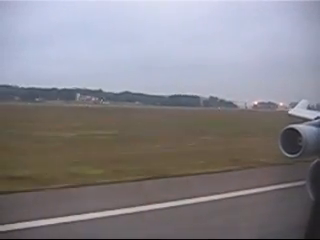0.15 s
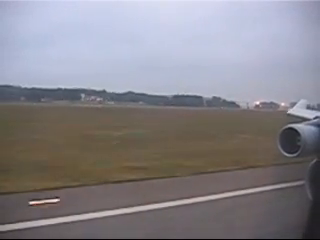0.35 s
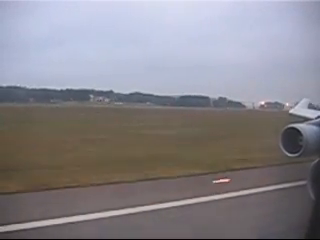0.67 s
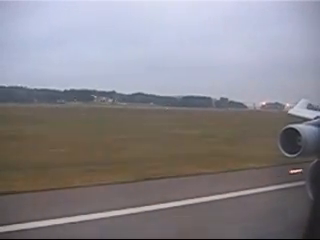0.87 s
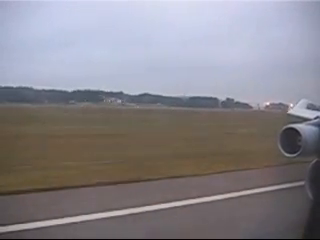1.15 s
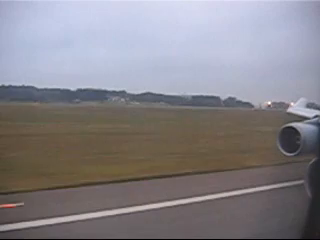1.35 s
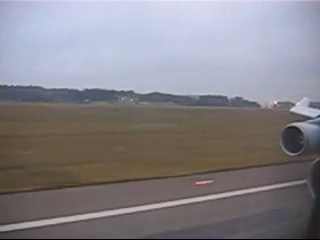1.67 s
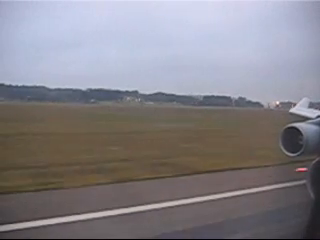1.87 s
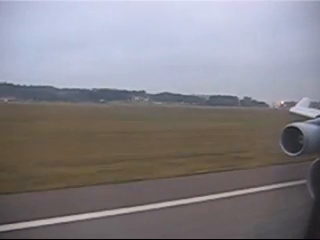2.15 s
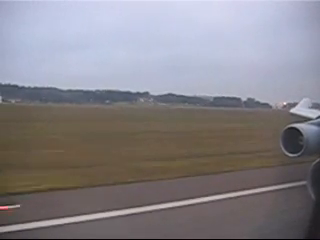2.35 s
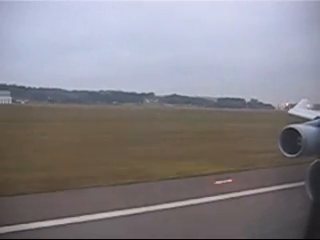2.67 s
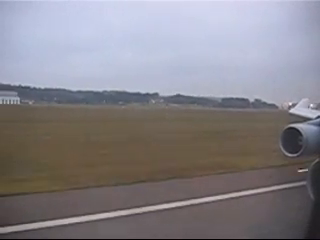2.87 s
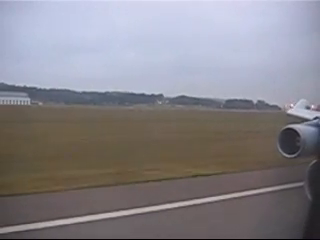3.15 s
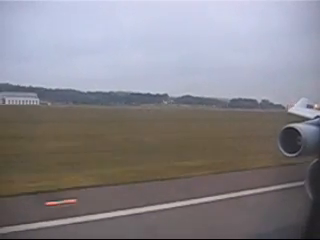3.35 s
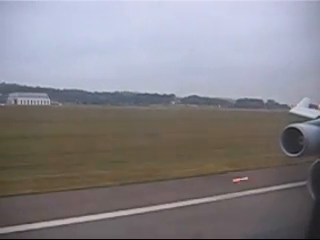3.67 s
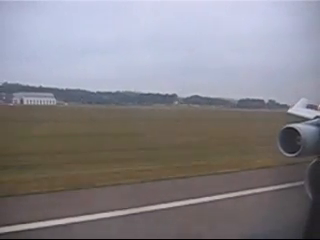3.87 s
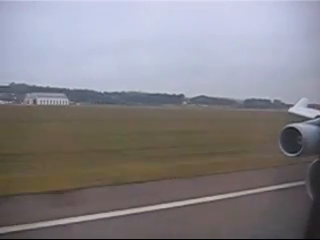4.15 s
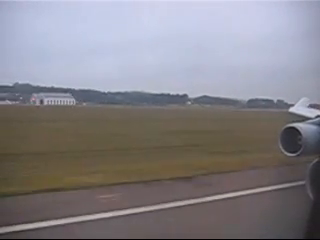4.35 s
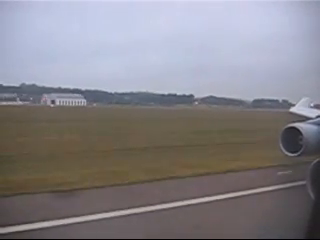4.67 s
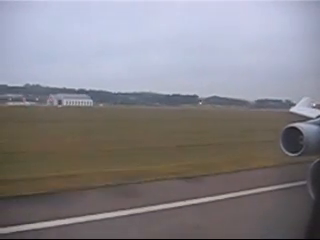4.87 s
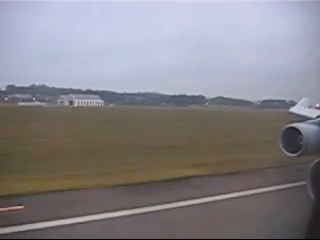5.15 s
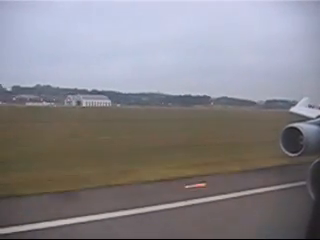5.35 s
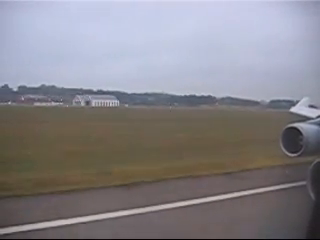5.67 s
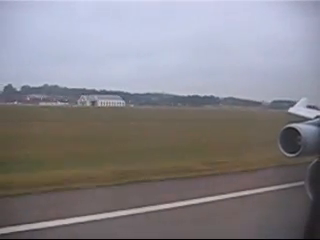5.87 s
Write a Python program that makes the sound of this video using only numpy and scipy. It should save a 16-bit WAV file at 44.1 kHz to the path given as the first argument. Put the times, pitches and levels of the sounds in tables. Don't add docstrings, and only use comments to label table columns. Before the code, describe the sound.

Inside an airliner cabin on the takeoff roll, big jet engines roar and whine at full thrust over a deep shuddering fuselage rumble.

```python
import sys
import numpy as np
from scipy import signal
from scipy.fft import rfft, irfft, next_fast_len
from scipy.io import wavfile
from scipy.ndimage import uniform_filter1d

SR = 44100
rng = np.random.default_rng(int(sys.argv[2]) if len(sys.argv) > 2 else 0)


def materialize(psi):
    bounded = np.clip(np.atleast_2d(psi).T, -1, 1)
    quanta = np.round(bounded * 32767).astype(np.int16)
    wavfile.write(sys.argv[1], SR, quanta)


def volts(x):
    e = np.asarray(x, float) / 20
    return 10 ** e


N = 265029

# t/s, level/dB, spread/s
PANEL_THRUMS = [(0.471, -26, 0.059), (1.181, -23, 0.042), (1.499, -25, 0.062), (1.72, -22, 0.045),
                (2.249, -19.5, 0.13), (2.9, -25, 0.064), (3.601, -20, 0.041), (3.8, -19.5, .08),
                (4.05, -20, 0.068), (4.3, -18.5, .05), (4.57, -23.5, 0.036), (4.85, -20, 0.056),
                (5.05, -23, 0.037), (5.251, -20, 0.042), (5.45, -20.5, 0.048), (5.75, -21.5, 0.064)]
# t/s, ring level/dB, spread/s, boom lift/dB
RUNWAY_DIPS = [(0.1, -15.5, .05, 5.5), (0.371, -15.5, 0.044, 3), (0.48, -18.5, 0.037, 3),
               (0.601, -8.5, .08, -0.5), (0.799, -10.5, 0.036, 0.5), (1.08, -15, .07, 0.5),
               (1.28, -10.5, .05, 2), (1.418, -12, 0.036, -3), (1.571, -10, 0.063, -1),
               (1.869, -16.5, .05, -0.5), (2.04, -21.5, .05, 3.5), (2.251, -18.5, 0.089, -1),
               (2.45, -16, .05, 0), (2.619, -13, .08, -3.5), (2.911, -11.5, 0.04, 2),
               (3.012, -4, .035, -2.5), (3.181, -11.5, .04, -1.5), (3.32, -15.5, .035, 3.5),
               (3.47, -14.5, 0.029, -3.5), (3.62, -20.5, 0.035, 1), (3.901, -10.5, 0.042, 0),
               (4.049, -17, .04, 0.5), (4.18, -13.5, .05, 4.5), (4.6, -11.5, .05, -0.5),
               (4.75, -11, .05, 0.5), (4.868, -12.5, .04, -2.5), (5.05, -17.5, 0.066, 3),
               (5.301, -17.5, .06, 2), (5.6, -17, 0.1, -1), (5.921, -22, 0.036, 5)]
# t/s, drone surge/dB, gain duck/dB
GEAR_JOLTS = [(0.03, -1, 2.5), (0.135, 1.5, 2.5), (0.21, -0.5, 5), (0.471, 1.5, 1.5), (0.78, -1.5, -0.5),
              (0.944, -0.5, 3.5), (1.198, 1, 2.5), (1.601, -1, 4), (1.859, 3.5, 2), (2.16, 2.5, 1),
              (2.529, 1.5, 2.5), (2.78, 0.5, 0.5), (2.92, 2.5, 0), (3.173, -2, 5), (3.351, 2.5, 5),
              (3.636, 4, 5), (3.798, 5, -1), (3.877, 5, 2), (4.036, 3.5, 1), (4.335, 4.5, 5),
              (4.599, 4, 2.5), (4.799, -1, 4.5), (5.024, 0.5, 4), (5.272, 5, 2.6), (5.473, 3, 5.5),
              (5.699, 3, 2.5), (5.918, 1.5, 6.5)]
# f/Hz, density level/dB
BOOM_SPECTRUM = [(8, -13), (20, -6.5), (45, -2.5), (63, -3), (90, -0.5), (130, -3.5), (200, -30)]
# f/Hz, density level/dB
DRONE_SPECTRUM = [(47, -27), (80, 1.5), (118, -5), (171, -2.5), (215, -10.5), (251, -6.5), (286, -14),
                  (316, -9), (350, -14.5), (400, -19.5), (520, -55.5), (880, -120)]
# f/Hz, width/Hz, lift/dB
CABIN_RESONANCES = [(34.76, 8, 4), (61.84, 12, 1.5), (753, 90, 4.5)]
# t/s, level/dB
BLADE_TONE = [(0.0, 9), (0.48, 10.5), (0.72, 8), (0.95, 10.5), (1.6, 3), (1.82, 8.5), (2.1, 6.5),
              (2.72, -2.5), (3.1, 5), (3.3, 4), (3.5, -3.5), (4.3, -5), (4.5, 2), (4.97, 6), (5.3, -0.5),
              (5.52, -7), (5.9, 0.5), (6.01, -1)]
# t/s, sixth order level/dB, ninth order level/dB, twice blade rate level/dB
SLOW_FAN_TONES = [(0.0, 14, 3, -36), (0.65, 19, -2.5, -16.5), (1.15, 12, 15.5, -15), (1.65, 17, 11, -18.5),
                  (1.92, 20, 8, -14.5), (2.4, 16, 16.5, -14), (2.85, 17, 17.5, -8), (3.3, 19, 16, -17),
                  (3.8, 15.5, 17.5, -12), (4.25, 15, 16, -15), (4.5, 14.5, 11, -16), (5.4, 7, 11, -18.5),
                  (5.8, 12.5, 14, -16), (5.89, 10.5, 15.5, -5), (6.01, 3.5, 9, -20.5)]
# multiple of shaft speed, level/dB
BUZZ_SAW = [(8, 6), (12, -3), (14, -9), (17, -7), (18, -2.5), (19, -2.5), (20, -7.5), (22, -12.5),
            (24, -22), (26, -18.5), (27, -17), (29, -16), (31, -16.5), (33, -19), (35, -18), (37, -13),
            (41, -19.5), (42, -13.5), (43, -19.5), (44, -20.5), (45, -20.5), (46, -19), (47, -23),
            (48, -24), (50, -20.5), (51, -24.5), (54, -21), (56, -22.5), (64, -29), (68, -24.5)]
# f/Hz, density level/dB
ROAR_SPECTRUM = [(160, -26.5), (280, -1), (321, -2), (382, -6), (471, -10.5), (514, -7.5), (674, -14.5),
                 (754, -13.5), (822, -14.5), (1280, -26), (1840, -27.5), (2010, -26), (2110, -31.5),
                 (2300, -30.5), (5400, -41.5), (7020, -77.5), (11900, -120)]
# t/s, level/dB
WINDOW_THRUST = [(0.0, -46.5), (0.45, -43.5), (0.75, -50.5), (1.0, -44.5), (1.5, -46), (1.85, -44),
                 (2.3, -46), (2.8, -45.5), (3.1, -44.5), (3.45, -45.5), (3.85, -43.5), (4.2, -46),
                 (4.85, -46), (5.1, -45.5), (5.4, -46.5), (5.7, -46), (6.01, -43)]

BLADES, SHAFT_HZ, CORE_HZ = 38, 52.0, 3646


def rms_one(x):
    return x / np.sqrt(np.mean(x ** 2) + 1e-20)


def in_time(rows):
    times, *columns = np.transpose(rows)
    return [np.interp(np.arange(N) / SR, times, column) for column in columns]


def swells(times, heights, spreads):
    t = np.arange(0, N + 40, 40) / SR
    total = np.zeros(len(t))
    for centre, height, spread in np.broadcast(times, heights, spreads):
        total += height * np.exp(-.5 * ((t - centre) / spread) ** 2)
    return np.interp(np.arange(N) / SR, t, total)


def drift(rate_hz):
    r = np.exp(-80 * np.pi * rate_hz / SR)
    noise = rng.standard_normal(N // 40 + 2002)
    slow = signal.lfilter([1], [1, -2 * r, r * r], noise)[2000:]
    return np.interp(np.arange(N) / 40, np.arange(len(slow)), rms_one(slow - slow.mean()))


def turbulence(spectrum_rows, patchy_db, low_hz, high_hz):
    size = next_fast_len(N)
    hz = np.fft.rfftfreq(size, 1 / SR) + 1e-3
    octave = np.log2(hz)
    point_hz, point_db = np.transpose(spectrum_rows)
    gain = volts(np.interp(np.log(hz), np.log(point_hz), point_db))
    gain = gain / np.sqrt((1 + (low_hz / hz) ** 8) * (1 + (hz / high_hz) ** 8))
    for mode_hz, width_hz, lift_db in CABIN_RESONANCES:
        gain = gain * volts(lift_db / (1 + (2 * (hz - mode_hz) / width_hz) ** 2))
    spectrum = rfft(rng.standard_normal(size)) * gain
    total = np.zeros(N)
    for k in range(3, 14):
        share = np.cos(np.pi / 2 * np.clip(octave - k, -1, 1)) ** 2
        band = irfft(spectrum * share, size)[:N]
        total += band * volts(patchy_db * drift(7.5))
    return rms_one(total)


def wandering_tone(hz, share, rate_hz):
    pitch = hz * (1 + share * drift(rate_hz))
    return np.sqrt(2) * np.sin(2 * np.pi * np.cumsum(pitch) / SR)


def ducking():
    recover_s = .16
    drops, r = np.zeros(N), np.exp(-1 / (recover_s * SR))
    for s, _, duck_db in GEAR_JOLTS:
        drops[int(s * SR)] = -duck_db
    return uniform_filter1d(signal.lfilter([1], [1, -r], drops), size=150)


def floor_panels():
    times, level_db, spreads = np.transpose(PANEL_THRUMS)
    return swells(times, volts(level_db), spreads) * wandering_tone(168.2, .06, 6.0)


def rocking_cabin():
    times, ring_db, spreads, lift_db = np.transpose(RUNWAY_DIPS)
    rocking = volts(-26.5) + swells(times, volts(ring_db), spreads)
    ring = volts(-3.5) * rocking * wandering_tone(63.5, .025, 2.5)
    follow_db = .15 * 20 * np.log10(rocking / rocking.mean())
    boom_db = -15.5 + follow_db + swells(times, lift_db, spreads)
    boom = turbulence(BOOM_SPECTRUM, patchy_db=1.75, low_hz=19, high_hz=100.0)
    return ring + volts(boom_db - 0.73) * boom


def wheel_drone(duck_db):
    times, surge_db, _ = np.transpose(GEAR_JOLTS)
    lead_s, spread_s = .025, .035
    drone_db = -16.5 + .7 * duck_db + swells(times - lead_s, surge_db, spread_s)
    drone = turbulence(DRONE_SPECTRUM, patchy_db=-1.0, low_hz=100.25, high_hz=299.0)
    return volts(drone_db + 1.25) * drone


def fan(roar_db):
    sixth_db, ninth_db, twice_db = in_time(SLOW_FAN_TONES)
    blade_db = in_time(BLADE_TONE)[0]
    shaft_angle = 2 * np.pi * np.cumsum(SHAFT_HZ * (1 + .0006 * drift(1.5))) / SR

    def tone(order, db, waver_db):
        level = volts(roar_db + db + waver_db * drift(4))
        return np.sqrt(2) * level * np.sin(order * shaft_angle + rng.uniform(0, 2 * np.pi))

    buzz = sum(tone(round(order), db - 0.3, waver_db=2.5) for order, db in BUZZ_SAW)
    hum = tone(6, sixth_db, waver_db=0.87) + tone(9, ninth_db + 0.22, waver_db=1.27)
    whine = tone(BLADES, blade_db + 1.7 * drift(25), waver_db=-1.4)
    core = tone(CORE_HZ / SHAFT_HZ, -20.5, waver_db=4.0)
    double = tone(2 * BLADES, twice_db + 0.79 * drift(25), waver_db=1.9)
    return buzz + hum + whine + core + double


def jet_roar(roar_db):
    roar = turbulence(ROAR_SPECTRUM, patchy_db=-1.25, low_hz=304.4, high_hz=9000)
    return volts(roar_db + 19.5) * roar


def scene():
    duck_db = ducking()
    roar_db = in_time(WINDOW_THRUST)[0] + duck_db
    airframe = floor_panels() + rocking_cabin() + wheel_drone(duck_db)
    return (airframe + fan(roar_db) + jet_roar(roar_db))[None]


def gain_control(x, ceiling_db, recover_db_s, attack_s):
    climb = recover_db_s * np.arange(N) / SR
    over = np.maximum(20 * np.log10(np.abs(x) + 1e-9) - ceiling_db, 0)
    held = np.maximum.accumulate(over + climb) - climb
    r = np.exp(-1 / (attack_s * SR))
    return x * volts(-signal.lfilter([1 - r], [1, -r], np.maximum(held, 0)))


def roll_off(x):
    return signal.sosfilt(signal.butter(12, 12800, fs=SR, output="sos"), x)


def record(dry):
    offset, middle, top, step, hold = .085, 0.031, 0.69, 0.0084, 4
    x = gain_control(1.14 * dry[0], ceiling_db=-2.5, recover_db_s=60.0, attack_s=0.0035) + offset
    swing = x - middle
    x = middle + swing / (1 + np.abs(swing / top) ** 14.0) ** (1 / 10.0)
    x = step * np.round(x[::hold] / step)
    held = np.repeat(x, hold)[:N]
    low_pass = signal.cheby1(14, .5, 12450, fs=SR, output="sos")
    mix = signal.sosfilt(low_pass, held)[None]
    return roll_off(mix)


dry = scene()
out = record(dry)
materialize(out)
```